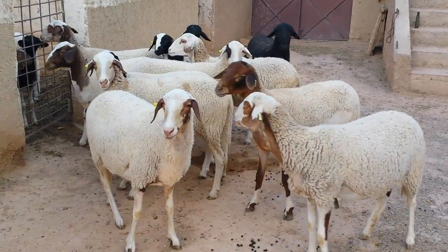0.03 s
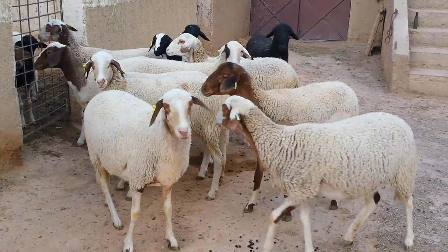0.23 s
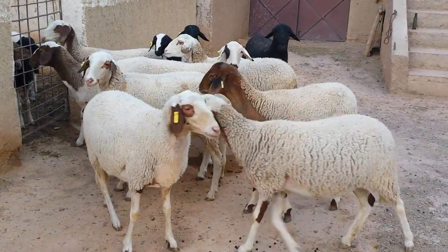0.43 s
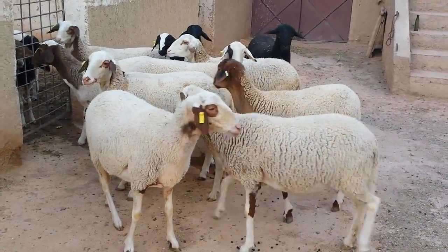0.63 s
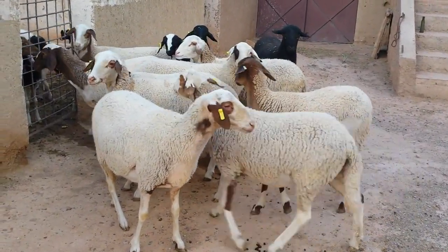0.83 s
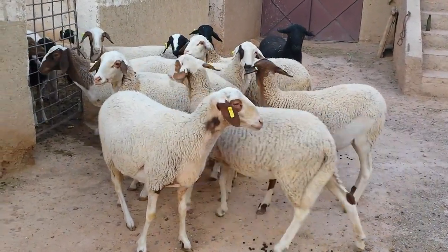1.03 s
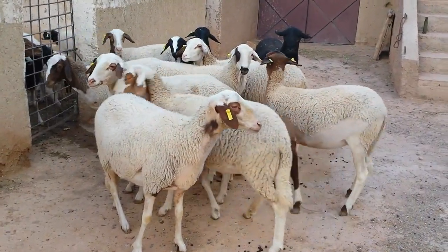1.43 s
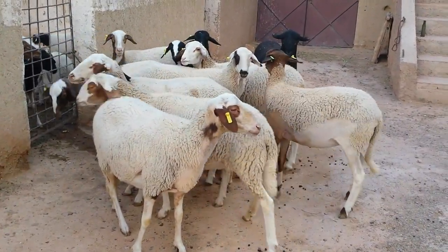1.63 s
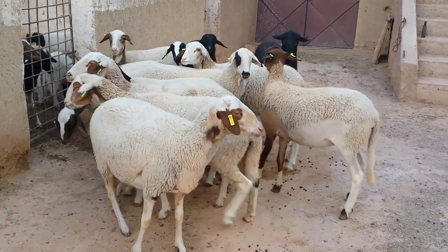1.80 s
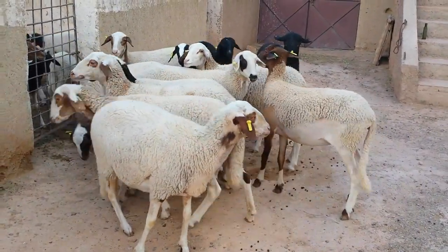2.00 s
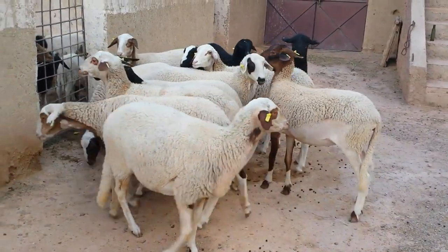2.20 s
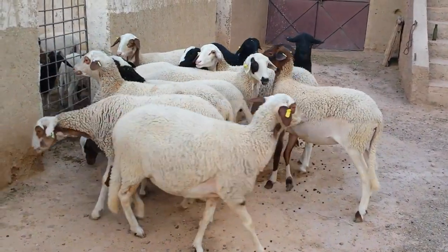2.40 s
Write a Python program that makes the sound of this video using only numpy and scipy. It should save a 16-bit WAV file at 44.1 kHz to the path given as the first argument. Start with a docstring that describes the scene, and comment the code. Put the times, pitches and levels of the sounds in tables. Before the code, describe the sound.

A sheep gives one hoarse, quavering bleat from the right, echoing briefly in a walled yard. Afterwards faint hoof steps, gritty scrapes and woolly rustles continue on concrete, while soft puffs of air bump the microphone.

```python
"""A sheep bleats in a walled yard

One hoarse, quavering bleat comes from the right: uneven pulses of the vocal folds ring the throat.
It starts with the mouth closed, opens into a rough "baa" and sags in pitch as it runs out.
The flock shuffles on gritty concrete, there is one dry tick, and puffs of air bump the microphone."""
import sys
import numpy as np
from scipy import signal
from scipy.fft import rfft, irfft, next_fast_len
from scipy.io import wavfile
from scipy.ndimage import uniform_filter1d, map_coordinates

SR = 44100
rng = np.random.default_rng(int(sys.argv[2]) if len(sys.argv) > 2 else 0)


def transcribe(signal):
    """Save signal, clipped to [-1, 1], as a 16-bit WAV file at the path in sys.argv[1]."""
    frames = np.atleast_2d(signal).T
    limited = np.clip(frames, -1, 1)
    pcm = np.round(limited * 32767).astype(np.int16)
    wavfile.write(sys.argv[1], SR, pcm)


N = 112454

QUAVER_HZ, QUAVER_PEAK_S, QUAVER_DB = 14.2, 0.513, 0.56
VOICE_LEAD_S = 0.0005  # the voice reaches the right side first
# How hard the sheep calls with its mouth open: time_s, relative_db
EFFORT = [(.115, -60), (.17, -55), (.2, -49), (.209, -42), (.24, -35), (.29, -32), (.45, -29.5), (.58, -31),
          (.63, -31.5), (.72, -31), (.82, -30), (.87, -43.5), (.94, -51.5), (1.02, -65.5), (1.06, -91)]
# How much quieter the voice is on the left: frequency_hz, left_minus_right_db
VOICE_SIDE = [(150, -2), (800, -2), (1300, -6), (2000, -9), (3000, -14), (6000, -27), (15000, -22)]
def bleat():
    """A hum opens into a trembling "baa" that echoes in the yard, over a deep tone with no echo."""
    t = clock()
    quaver = np.cos(2 * np.pi * QUAVER_HZ * (t - QUAVER_PEAK_S))
    waver = map_coordinates(rng.standard_normal(int(t[-1] * 45) + 4), [t * 45])  # 45 values a second
    buzz, rasp, phase, strength = vocal_folds(quaver, waver)
    baa = open_mouth(buzz, rasp, quaver) * swell(EFFORT) * amp(QUAVER_DB * quaver)
    voice = in_yard(baa + nose_hum(buzz), VOICE_SIDE, echo_db=-2.5, lead_s=VOICE_LEAD_S)
    deep_right = chest_tone(phase, strength, quaver, waver)
    deep_left = amp(VOICE_SIDE[0][1]) * np.interp(t - VOICE_LEAD_S, t, deep_right)
    return voice + np.array([deep_left, deep_right])


QUAVER_BEND, WAVER_BEND = 0.025, 0.03  # fractions of the pitch
JITTER_S, SHIMMER_DB, RASP_SHARE = 0.0002, 1.3, 0.25
# The tune of the bleat: time_s, pitch_hz
PITCH = [(.12, 144.2), (.22, 159.9), (.3, 167.5), (.4, 166.1), (.5, 176.8), (.58, 171.6), (.64, 164.5),
         (.71, 169.3), (.77, 151.2), (.85, 144.4), (1.03, 138.5)]
def vocal_folds(quaver, waver):
    """The folds snap shut in pulses of uneven timing and strength, each with a rasp of noise."""
    t = clock()
    pitch_hz = curve(PITCH) * (1 + QUAVER_BEND * quaver + WAVER_BEND * waver)
    cycles = np.cumsum(pitch_hz) / SR
    pulse_s = np.interp(np.arange(1, int(cycles[-1])), cycles, t)
    chance = rng.standard_normal((len(pulse_s), 2))
    pulse_s += JITTER_S * chance[:, 0]
    sizes = amp(SHIMMER_DB * chance[:, 1])
    phase = np.interp(t, pulse_s, np.arange(len(pulse_s)))  # goes up by one at each pulse
    strength = np.interp(t, pulse_s, sizes)
    pulse_samples = np.clip(np.round(pulse_s * SR).astype(int), 0, N - 1)
    pulses = unit(np.bincount(pulse_samples, sizes, N))
    rasp = unit(rng.standard_normal(N) * strength * np.exp(-2 * (phase % 1)))
    buzz = np.sqrt(1 - RASP_SHARE) * pulses + np.sqrt(RASP_SHARE) * rasp
    return buzz, rasp, phase, strength


# The lowest ring of the throat, moved by the jaw: time_s, ring_hz, relative_db
JAW = [(.17, 775, 2.5), (.23, 796, 4.5), (.3, 837, -4), (.43, 860, -4), (.6, 858, -3.5), (.7, 845, -6),
       (.77, 806.3, -9), (.83, 780, -5.5), (.93, 844.6, -7.5)]
# The second ring, moved by the tongue: time_s, ring_hz
TONGUE = [(.14, 1520), (.21, 2080), (.3, 1883), (.43, 1839), (.53, 1877), (.73, 1880), (.8, 1860),
          (.92, 1890)]
# The third ring, moved by the lips: time_s, ring_hz, relative_db
LIPS = [(.23, 2230, -4.5), (.33, 2230, -12), (.56, 2450, -13.5), (.68, 2540, -10.5), (.8, 2744, -6),
        (.95, 2600, -11)]
# Rings that stay put: ring_hz, width_hz, relative_db
THROAT = [(840, 60, -2), (1760, 170, 0)]
# The tone between and around the rings: frequency_hz, relative_db
BODY_TONE = [(60, -14), (130, -6.5), (230, -4.5), (330, -4.5), (430, -1.5), (540, 2.5), (720, 5.5),
             (1080, 0), (1600, -1.5), (2200, -14), (4000, -63.5)]
# The bright edge of the voice: frequency_hz, relative_db
TREBLE_TONE = [(1900, -29.5), (2600, 1), (3200, 0.5), (4400, -15.5), (6200, -10), (8500, -24.5),
               (15000, -44)]
# How that edge comes and goes: time_s, relative_db
TREBLE_LEVEL = [(.24, 10), (.45, 4), (.55, 9), (.66, 4), (.75, 11.5), (.82, 10), (.88, 21.5), (1.0, 11)]
def open_mouth(buzz, rasp, quaver):
    """The buzz makes the throat ring (resonate); jaw, tongue and lips move the three main rings."""
    jaw_hz = curve(JAW) + 14 * quaver  # the jaw trembles with the quaver
    jaw = amp(curve(JAW, column=2)) * moving_resonance(buzz, jaw_hz, width_hz=160)
    tongue = moving_resonance(buzz, curve(TONGUE), width_hz=170)
    lips = amp(curve(LIPS, column=2)) * moving_resonance(buzz, curve(LIPS), width_hz=570)
    steady_rings = lambda f: sum((-1) ** k * amp(db) * resonance(f, hz, width_hz)
                                 for k, (hz, width_hz, db) in enumerate(THROAT))
    throat = amp(-2.5) * unit(filtered(buzz, steady_rings))
    body = amp(-4.5) * coloured(buzz, BODY_TONE)
    treble = amp(curve(TREBLE_LEVEL) - 19.5) * coloured(buzz + rasp, TREBLE_TONE)
    return jaw - tongue + lips + throat + body + treble


# The closed-mouth start: time_s, ring_hz, relative_db
NOSE = [(.1, 346, -57), (0.121, 283, -40.5), (0.145, 288, -39), (.165, 330, -55), (.2, 520, -49.5),
        (0.261, 496, -48)]
def nose_hum(buzz):
    """The buzz rings in the nose as the bleat begins."""
    loudness = swell([(time_s, db) for time_s, _, db in NOSE])
    return loudness * moving_resonance(buzz, curve(NOSE), width_hz=125)


CHEST_DB, FLUTTER_DB, OCTAVE_DB = -2, 3.5, -14.5
# The loudness of the voice's lowest note: time_s, relative_db
CHEST = [(.12, -72), (.22, -47.5), (.27, -39), (.52, -42.5), (.62, -42), (.7, -42.5), (.79, -39),
         (.92, -41.5), (.99, -54.5), (1.06, -65)]
def chest_tone(phase, strength, quaver, waver):
    """The lowest note of the pulses flutters with the quaver; a softer note sits an octave above."""
    lowest = unit(strength * np.cos(2 * np.pi * phase)) * swell(CHEST)
    octave = unit(strength * np.cos(4 * np.pi * phase + waver)) * swell(EFFORT)
    return lowest * amp(CHEST_DB + FLUTTER_DB * quaver) + octave * amp(OCTAVE_DB)


# How much quieter the flock is on the left: frequency_hz, left_minus_right_db
FLOCK_SIDE = [(200, -4), (1000, -0.5), (2500, -13), (6000, -22.5), (10000, -12), (15000, -7.5)]
def flock():
    """Hooves and bodies move about on the right of the yard."""
    movement = hoof_scrapes() + hoof_steps() + wool_rustle()
    return in_yard(movement, FLOCK_SIDE, echo_db=-24.5, lead_s=0.00016)


GRAINS_PER_S, GRAIN_SPREAD_DB = 5000, 2.5
# Each scrape of a hoof: peak_s, rise_s, fall_s, level_db
SCRAPES = [(0.134, 0.018, 0.031, -47), (.465, 0.0051, 0.0075, -40), (0.801, .05, 0.089, -47.5),
           (1.03, 0.037, 0.022, -48.5), (1.157, 0.011, 0.014, -52.5), (1.888, 0.0065, 0.0092, -57),
           (1.955, 0.012, 0.0051, -44.5), (1.983, 0.0075, 0.0063, -48.5), (2.103, 0.013, 0.0087, -53.5),
           (2.19, 0.022, 0.015, -42), (2.42, 0.036, 0.039, -55), (2.488, .005, 0.0066, -45)]
# The tone of the grit: frequency_hz, relative_db
GRIT_TONE = [(150, -7.5), (600, -7), (1300, -10), (2600, -2.5), (4200, -10.5), (5600, -0.5), (7000, -2.5),
             (8800, -12.5), (15000, -15)]
def hoof_scrapes():
    """Hooves drag loose grains over the concrete, making a spray of tiny clicks."""
    grains = (rng.random(N) < GRAINS_PER_S / SR) * rng.standard_normal(N)
    grains *= amp(GRAIN_SPREAD_DB * np.minimum(rng.exponential(size=N), 3))
    loudness = sum(amp(db) * burst(peak_s, rise_s, fall_s) for peak_s, rise_s, fall_s, db in SCRAPES)
    return coloured(grains, GRIT_TONE) * loudness


KNOCK_RISE_S, KNOCK_FALL_S = 0.0069, 0.0073
CLICK_RISE_S, CLICK_FALL_S = 0.0007, 0.003
# Each hoof coming down: start_s, knock_db, click_db, click_pitch_hz
STEPS = [(.966, -47, -37, 5306), (1.153, -70, -44.5, 5300), (1.174, -60.5, -43, 5870),
         (1.183, -50, -63.5, 1190), (1.46, -51, -50, 5060), (1.474, -57.5, -50, 600),
         (1.584, -52, -51.5, 1470), (1.62, -61.5, -52.5, 1700), (1.761, -75, -53, 5110),
         (1.874, -62, -60.5, 1100), (1.947, -49.5, -36.5, 5420), (1.977, -59, -48.5, 2610),
         (2.199, -68, -42.5, 2390), (2.211, -67, -41.5, 2410), (2.469, -57.5, -48.5, 1780),
         (2.479, -56.5, -46, 1480)]
# The tone of the knock: frequency_hz, relative_db
KNOCK_TONE = [(50, -0.5), (170, 11), (300, -6), (600, 3), (1000, -18.5), (1600, -3.5), (3000, -8.5),
              (8000, -19)]
def hoof_steps():
    """A hoof lands on concrete with a sharp click of its rim and a dull knock."""
    knock = coloured(rng.standard_normal(N), KNOCK_TONE)
    crack = rng.standard_normal(N)
    steps = np.zeros(N)
    for start_s, knock_db, click_db, pitch_hz in STEPS:
        click = unit(filtered(crack, lambda f: resonance(f, pitch_hz, width_hz=0.3 * pitch_hz)))
        steps += amp(knock_db) * knock * burst(start_s + KNOCK_RISE_S, KNOCK_RISE_S, KNOCK_FALL_S)
        steps += amp(click_db) * click * burst(start_s + CLICK_RISE_S, CLICK_RISE_S, CLICK_FALL_S)
    return steps


# How loudly the bodies shuffle: time_s, level_db
SHUFFLE = [(0, -61), (1.1, -64.5), (1.28, -64), (1.35, -58.5), (1.45, -58), (1.56, -62), (1.7, -74.5),
           (1.85, -71), (1.95, -62), (2.15, -68), (2.35, -58), (2.55, -62.5)]
# The tone of the wool: frequency_hz, relative_db
WOOL_TONE = [(60, -2), (110, -1.5), (220, -4.5), (350, -3), (700, -15), (1100, -21.5), (2200, -15),
             (4200, -22.5), (6200, -13.5), (9000, -28.5), (15000, -19.5)]
def wool_rustle():
    """Woolly bodies shuffle with a soft noise that rises and falls."""
    return coloured(rng.standard_normal(N), WOOL_TONE) * amp(curve(SHUFFLE))


def tick(start_s=0.0762, pitch_hz=1343, fade_s=0.00032):
    """One dry tick close to the microphone: a tone that dies almost at once."""
    age_s = np.maximum(clock() - start_s, 0)
    loudness = amp(-26) * age_s / fade_s * np.exp(-age_s / fade_s)
    return loudness * np.sin(2 * np.pi * pitch_hz * age_s)


# Each puff of air: peak_s, rise_and_fall_s, left_db, right_db
PUFFS = [(0.016, 0.0094, -67, -45.5), (0.193, 0.058, -47.5, -46.5), (0.421, .015, -69, -50),
         (1.004, 0.03, -52, -46.5), (1.37, 0.015, -43.5, -74.5), (1.456, 0.018, -44.5, -70),
         (2.383, 0.014, -69, -48.5)]
# The tone of a puff: frequency_hz, relative_db
PUFF_TONE = [(20, -21.5), (50, -3.5), (90, 2.5), (140, -17), (250, -36), (800, -26), (3000, -74.5)]
# The tone of the steady background: frequency_hz, relative_db
AIR_TONE = [(25, 3), (60, 0), (130, -2.5), (450, -6), (1000, -13.5), (6000, -15), (15500, -20)]
def air():
    """Low puffs bump the microphone over a faint, steady background, different on each side."""
    noise = rng.standard_normal((2, N)) + 0.27 * rng.standard_normal(N)  # a little is on both sides
    background = amp(-66.5) * coloured(noise, AIR_TONE)
    puffs = sum(amp([[left_db], [right_db]]) * burst(peak_s, fade_s, fade_s)
                for peak_s, fade_s, left_db, right_db in PUFFS)
    return background + puffs * coloured(rng.standard_normal((2, N)), PUFF_TONE)


MIC_SPACING_M, SOUND_M_PER_S = 0.17, 343
# How long the yard's echo takes to drop by 60 dB: frequency_hz, fade_s
YARD_FADE = [(150, 0.77), (800, 0.35), (2000, 0.44), (6000, 0.33), (14000, 0.15)]
# Bounces off the near walls: delay_s, left_gain, right_gain
WALLS = [(.0043, 0.068, 0.27), (0.009, 0.42, 0.061), (0.018, -0.14, .14)]
def in_yard(sound, side, echo_db, lead_s):
    """A sound reaches the right side first, then bounces off the walls and leaves a fading echo."""
    hz, t, noise = signal.stft(rng.standard_normal((2, SR * 3 // 4)), SR, nperseg=256)
    alike = np.sinc(2 * hz * MIC_SPACING_M / SOUND_M_PER_S)[:, None]  # low notes match on both sides
    noise[0] = alike * noise[1] + np.sqrt(1 - alike ** 2) * noise[0]
    fade = amp(-60 * t / along(YARD_FADE, hz)[:, None])
    tail = signal.istft(noise * fade, SR, nperseg=256)[1]
    echo = signal.fftconvolve(sound[None], tail / np.linalg.norm(tail[0]), axes=1)[:, :N]
    delay = lambda f, s: np.exp(-2j * np.pi * f * s)
    direct = filtered(sound, lambda f: np.array([delay(f, lead_s), delay(f, 0)]))
    bounces = filtered(sound, lambda f: sum(np.array([[left], [right]]) * delay(f, delay_s)
                                            for delay_s, left, right in WALLS))
    quieter_left = lambda f: np.array([amp(along(side, f)), np.ones(len(f))])
    return filtered(direct + bounces + amp(echo_db) * echo, quieter_left)


def amp(db):
    """Turn decibels into a number to multiply by."""
    return 10 ** (np.asarray(db) / 20)


def unit(x):
    """Scale a sound to an average power of 1."""
    return x / np.sqrt(np.mean(x ** 2) + 1e-20)


def clock():
    """The time of each sample in seconds."""
    return np.arange(N) / SR


def along(points, hz):
    """Read a table of frequency_hz, value at hz, on a log frequency scale."""
    frequencies, values = np.transpose(points)
    return np.interp(np.log(hz + 1), np.log(frequencies + 1), values)


def curve(rows, column=1):
    """Join a table's points in time with straight lines, one value per sample."""
    columns = np.transpose(rows)
    return np.interp(clock(), columns[0], columns[column])


def swell(rows):
    """Loudness from rows of time_s, level_db, fading quickly outside them."""
    outside_s = np.abs(clock() - np.clip(clock(), rows[0][0], rows[-1][0]))
    return amp(curve(rows)) * np.exp(-outside_s / 0.014)


def burst(peak_s, rise_s, fall_s):
    """Loudness that rises to a sharp peak and falls away."""
    t = clock() - peak_s
    return np.exp(-np.abs(t / np.where(t < 0, rise_s, fall_s)) ** 0.85)


def filtered(x, response):
    """Multiply each frequency f in a sound by response(f)."""
    size = next_fast_len(N + SR // 2)
    return irfft(rfft(x, size) * response(np.fft.rfftfreq(size, 1 / SR)), size)[..., :N]


def coloured(x, tone):
    """Shape a sound with a tone table, at an average power of 1."""
    return unit(filtered(x, lambda f: amp(along(tone, f))))


def resonance(f, hz, width_hz):
    """A ring at hz; a second, wide band makes its sides steeper."""
    band = lambda width: 1j * f * width / (hz * hz - f * f + 1j * f * width)
    return band(width_hz) * band(hz * 0.67)


def moving_resonance(x, hz, width_hz):
    """Pass a sound through a ring whose centre follows the curve hz."""
    turn = np.exp(2j * np.pi * np.cumsum(hz) / SR)
    low_pass = signal.butter(2, width_hz / 2, fs=SR)
    return unit((signal.lfilter(*low_pass, x / turn) * turn).real)  # shift down, filter, shift back


def scene():
    """The bleat over the shuffling flock."""
    return bleat() + flock() + tick() + air()


def record(dry, hiss_db=-33.5, smooth_s=0.12, top_hz=15700):
    """A faint hiss follows the loudness; nothing passes above top_hz."""
    power = uniform_filter1d(np.mean(dry ** 2, axis=0), int(smooth_s * SR))
    hiss = amp(hiss_db) * np.sqrt(np.abs(power)) * rng.standard_normal((2, N))
    return filtered(dry + hiss, lambda f: f < top_hz)


dry = scene()
out = record(dry)
transcribe(out)
```